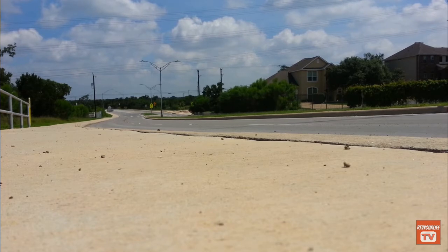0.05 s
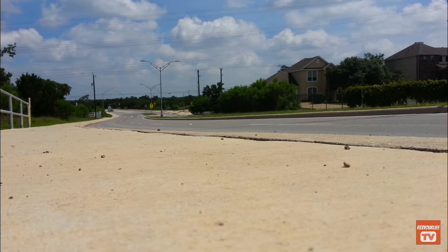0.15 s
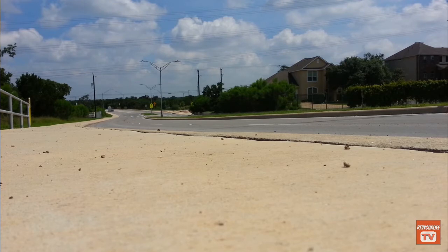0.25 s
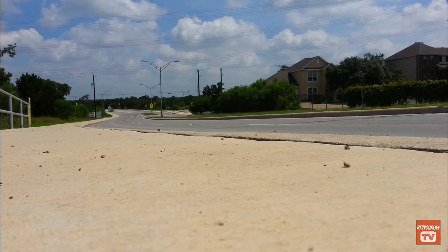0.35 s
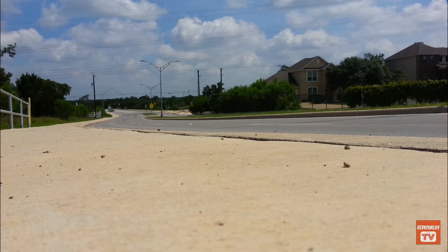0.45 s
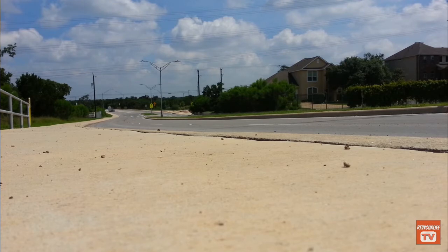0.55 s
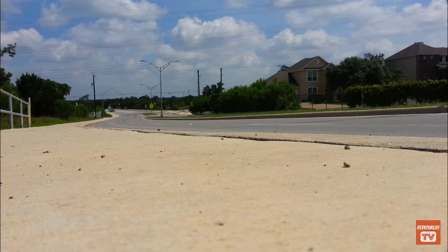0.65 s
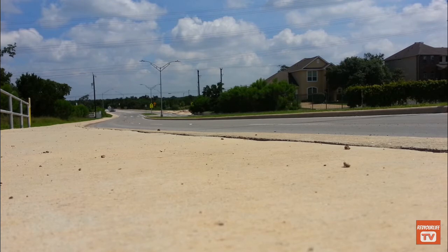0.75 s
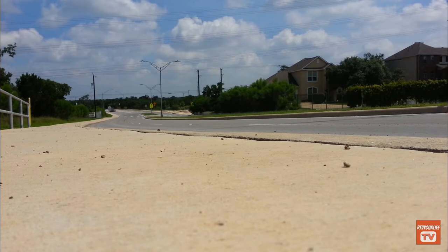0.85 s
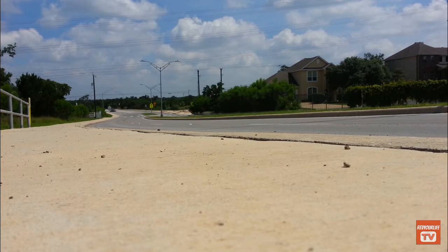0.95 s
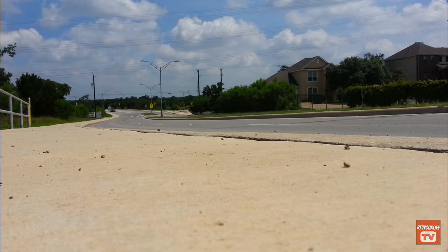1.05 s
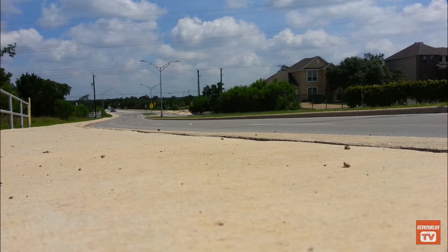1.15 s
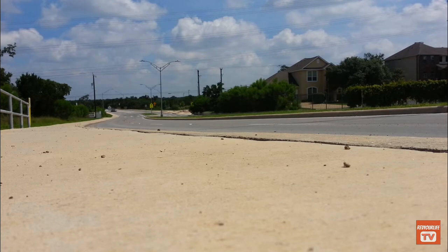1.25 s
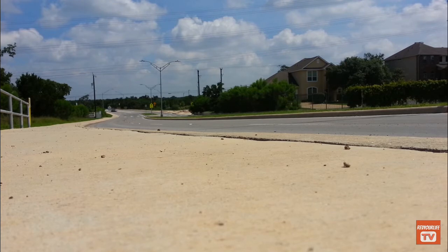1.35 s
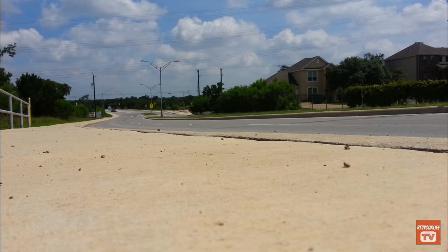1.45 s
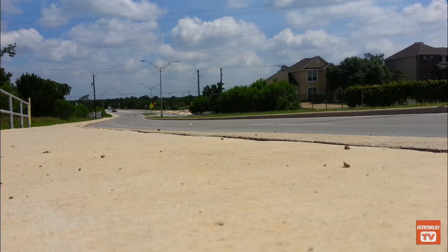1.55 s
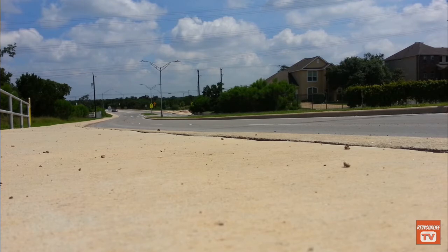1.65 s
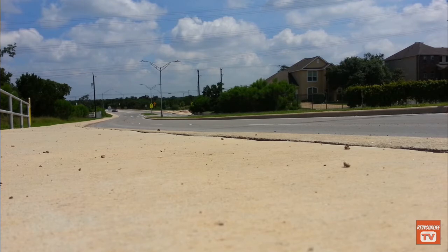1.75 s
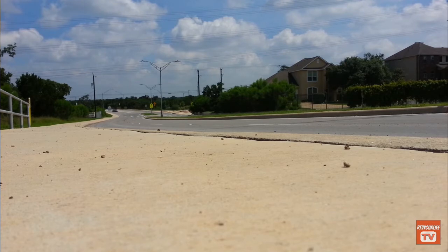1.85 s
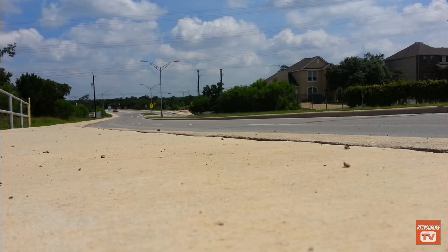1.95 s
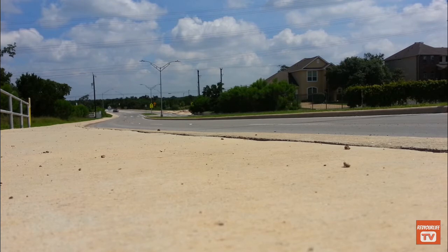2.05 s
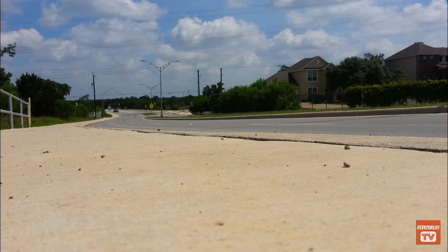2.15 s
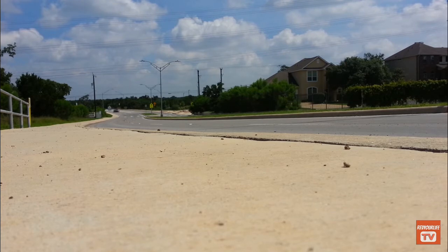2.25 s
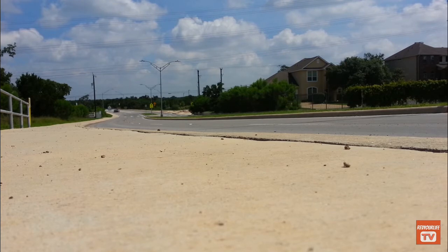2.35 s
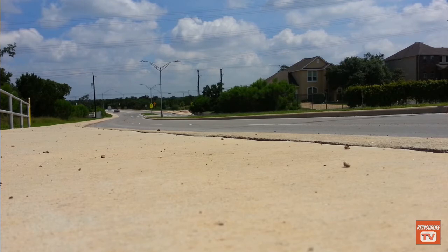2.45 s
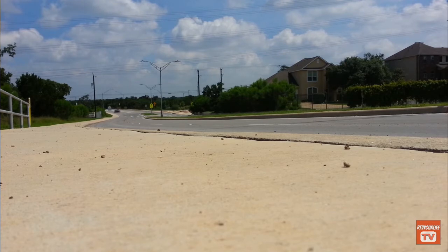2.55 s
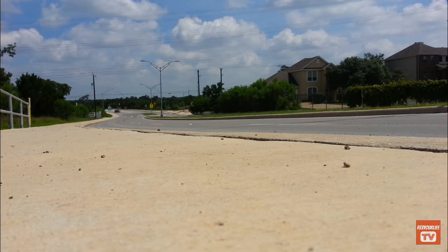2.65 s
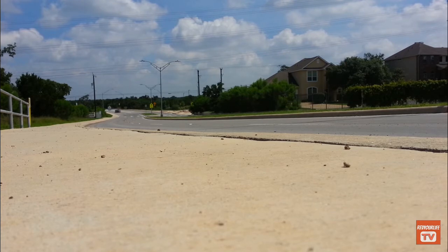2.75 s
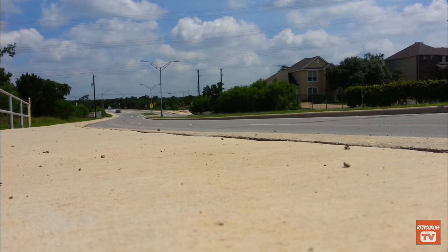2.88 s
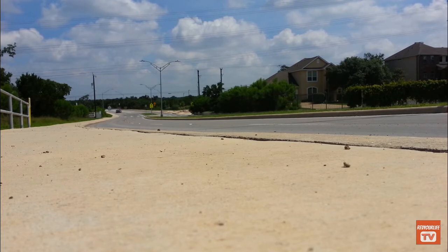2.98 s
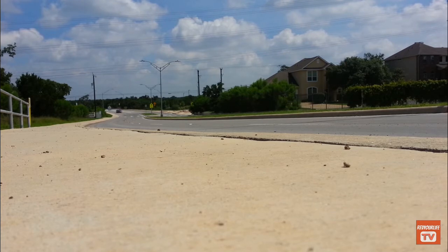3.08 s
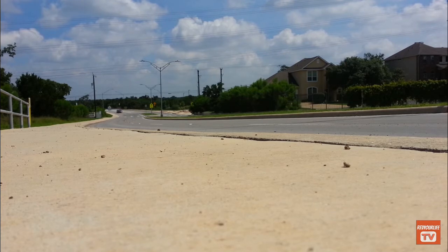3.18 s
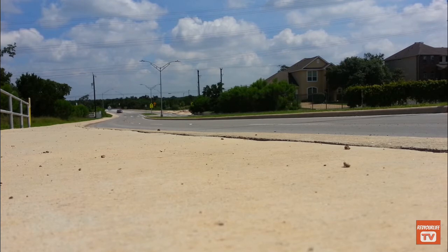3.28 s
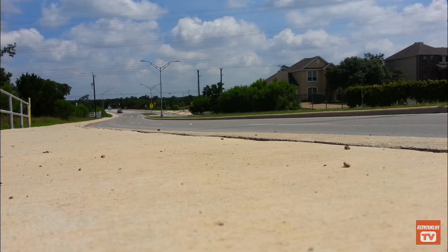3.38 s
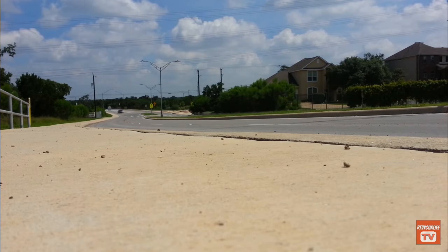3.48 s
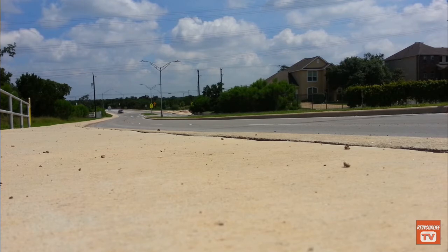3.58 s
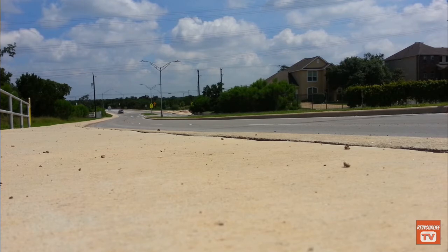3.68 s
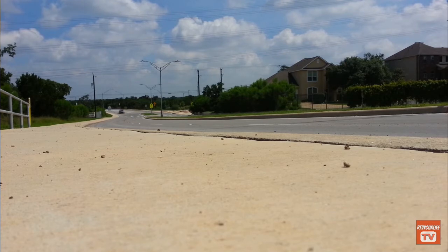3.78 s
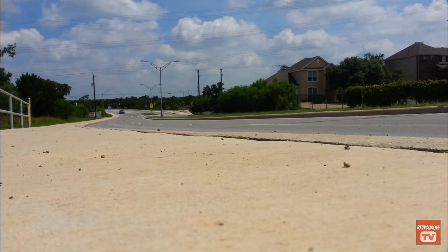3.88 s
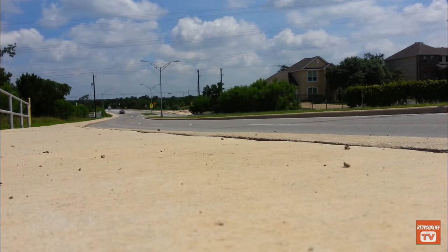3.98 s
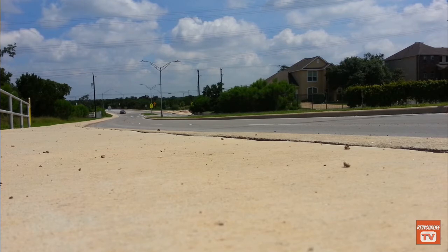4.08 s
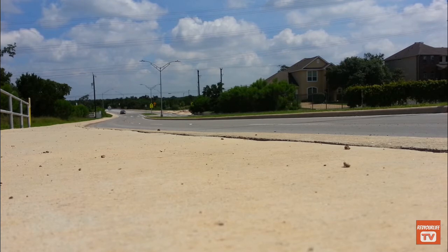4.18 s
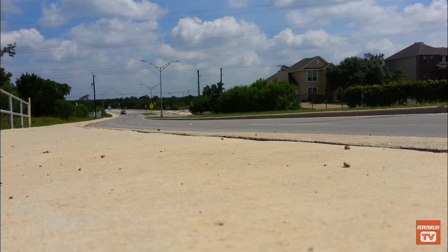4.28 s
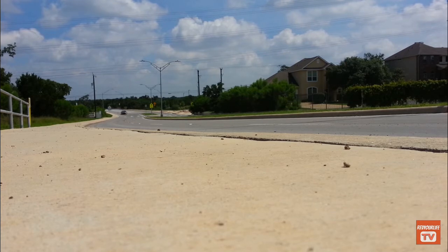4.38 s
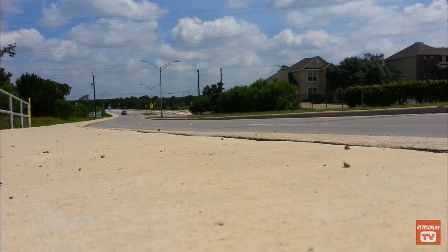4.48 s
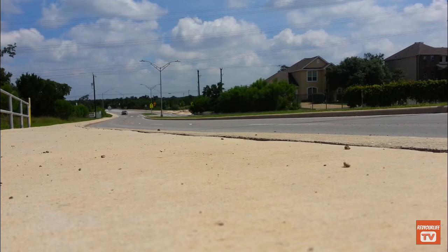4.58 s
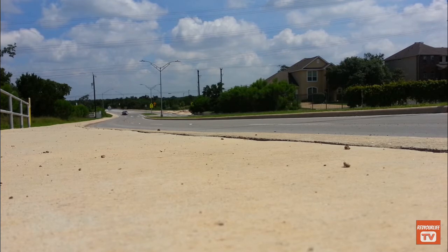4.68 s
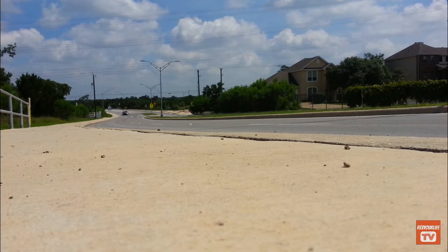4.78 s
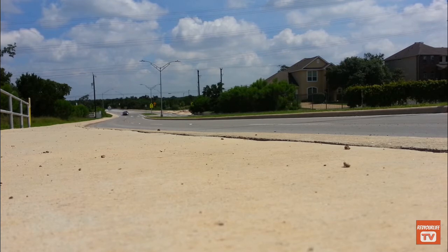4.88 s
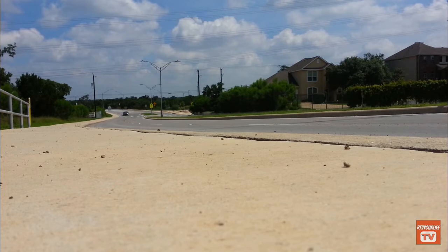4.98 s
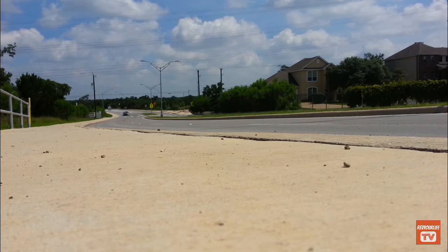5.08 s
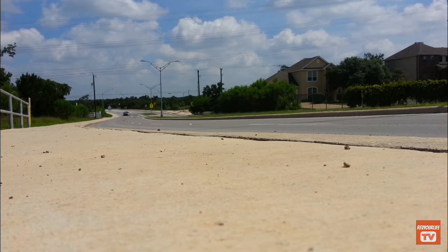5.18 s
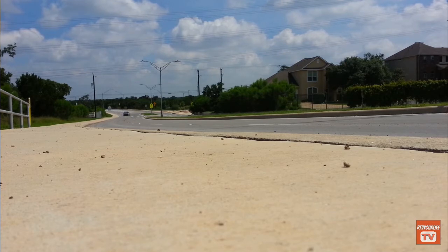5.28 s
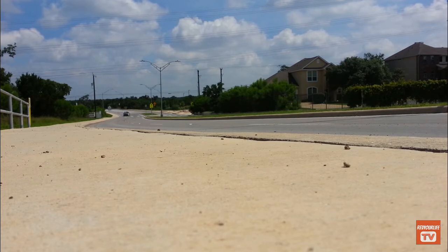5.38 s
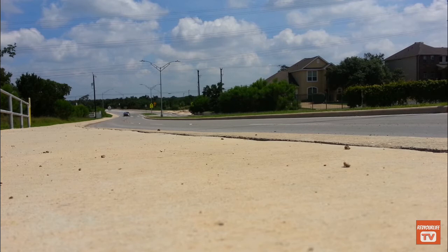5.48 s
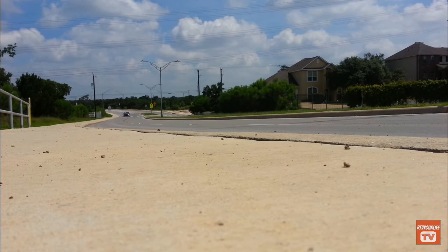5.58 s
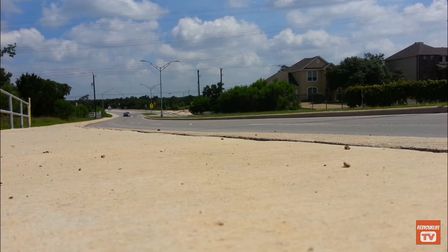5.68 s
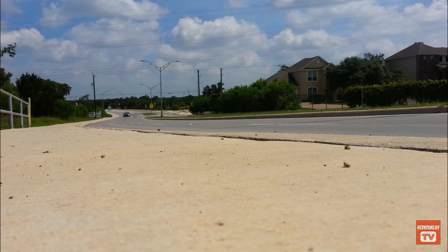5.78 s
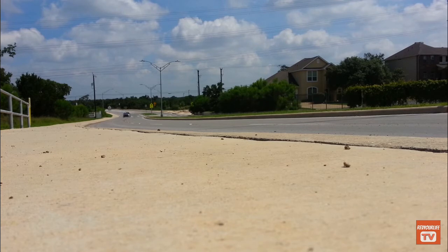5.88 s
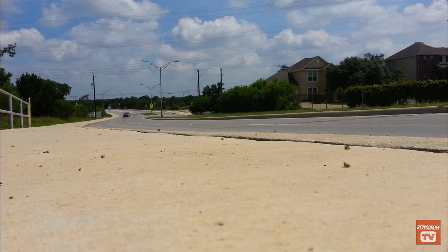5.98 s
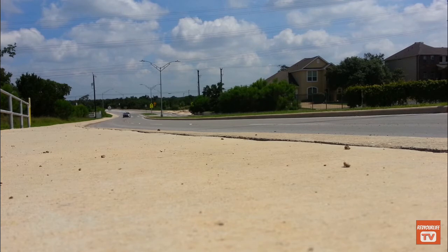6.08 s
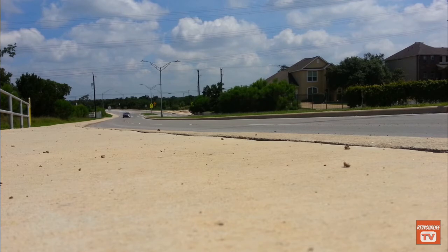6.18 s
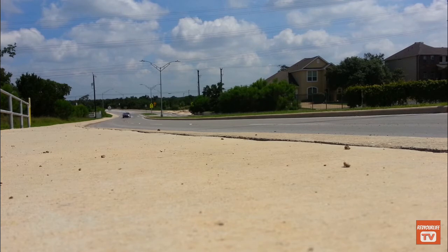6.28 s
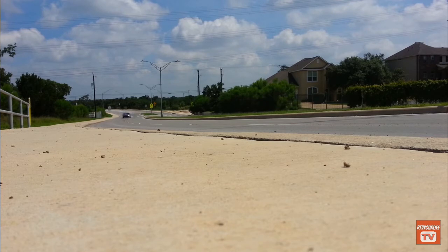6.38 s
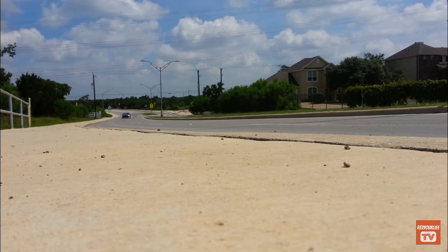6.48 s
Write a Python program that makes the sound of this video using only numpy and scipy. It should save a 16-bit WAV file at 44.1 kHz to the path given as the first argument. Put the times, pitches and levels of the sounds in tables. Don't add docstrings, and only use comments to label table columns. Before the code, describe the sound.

A small single microphone near the ground hears a fading cicada, chirping birds with thin wavering whistles, and distant traffic murmur. After about two and a half seconds a far engine pulls away, rises steadily to high revs, shifts with a raspy chirping release of turbo air, then accelerates again towards the listener. House fronts return late echoes. Small handling ticks occur, one loud near the end; the sound stops while the car is still approaching.

```python
import sys
import numpy as np
from scipy import signal
from scipy.fft import rfft, irfft
from scipy.io import wavfile
from scipy.ndimage import uniform_filter1d

SR = 44100
rng = np.random.default_rng(int(sys.argv[2]) if len(sys.argv) > 2 else 0)


def dump(signal):
    limited = np.clip(np.atleast_2d(signal).T, -1, 1)
    pcm = np.round(limited * 32767).astype(np.int16)
    wavfile.write(sys.argv[1], SR, pcm)


def boost_factor(decibels):
    exponent = np.asarray(decibels, float) / 20
    return 10 ** exponent


N = 288414
T = np.arange(N) / SR

# time in seconds, firing rate in Hz, load in dB, # exhaust note over the load in
# dB, treble let through by the hedges in dB (negative is duller).
DRIVE = [(2.55, 84.33, -55, -8.5, -23), (2.8, 118.3, -50, 2, -21), (3.0, 143.8, -46.5, 0, -15),
         (3.15, 156.7, -43.5, 4, -9), (3.31, 168.7, -43.5, -8, -16), (3.43, 179.5, -43, 1.5, -2.5),
         (3.75, 201.6, -41.5, -0.5, 0.5), (4.02, 234.9, -39.5, -0.5, -2), (4.3, 283.7, -33.5, -5.5, 0),
         (4.56, 332.8, -33, 1, 5.5), (4.71, 330.7, -31.5, -3, 2.5), (4.92, 225.4, -33, -1, 2),
         (5.05, 229.5, -31.5, 2.5, -3.5), (5.4, 261.2, -34, -0.5, 0), (5.95, 308, -31, 0.5, -1),
         (6.1, 314, -30.5, 2.5, -0.5), (6.3, 332, -27, -7, 1), (6.54, 347, -25, -1, -3.5)]
# pitch in Hz, width in Hz, strength in dB.
EXHAUST_PIPE = [(357, 122, 4), (591, 112, 2), (836, 95, 0.5), (1198, 140, -10)]


def level(x, db):
    return x * boost_factor(db) / np.sqrt(np.mean(x ** 2))


def read(table):
    s, *columns = np.transpose(table)
    fade_s = .1
    inside = np.clip(np.minimum(T - s[0] + fade_s, s[-1] + fade_s - T) / fade_s, 0, 1)
    return [np.interp(T, s, c) for c in columns] + [inside]


def colour(x, points):
    hz, db = np.transpose(points)
    f = np.arange(N // 2 + 1) * SR / N + 1
    return irfft(rfft(x) * boost_factor(np.interp(np.log(f), np.log(hz), db)), N)


def cut(x, hz, kind="band", order=4):
    return signal.sosfilt(signal.butter(order, hz, kind, fs=SR, output="sos"), x)


def resonate(x, modes):
    out = 0
    for k, (hz, width, db) in enumerate(modes):
        b, a = signal.iirpeak(hz, hz / width, SR)
        out = out + (-1) ** k * boost_factor(db) * signal.lfilter(b, a, x)
    return out


def noise():
    return rng.standard_normal(N)


def walk(rate):
    k = int(SR / rate)
    steps = np.repeat(rng.standard_normal(N // k + 1), k)
    return 1.3 * uniform_filter1d(uniform_filter1d(steps, k), k)[:N]


def pulses(cycles, sizes):
    whole = np.arange(np.ceil(cycles[0]), np.floor(cycles[-1]))
    at = np.interp(whole, cycles, np.arange(N)).clip(0, N - 2)
    out, i = np.zeros(N), at.astype(int)
    size = boost_factor(sizes[:len(at)])
    np.add.at(out, i, size * (1 - at + i))
    np.add.at(out, i + 1, size * (at - i))
    return out


def chirps(table, bend, flutter_db, rough=0.):
    out, flutter = np.zeros(N), boost_factor(flutter_db * walk(120))
    for s, length, hz0, hz1, db in table:
        u = np.arange(int(length * SR)) / (length * SR)
        hz = hz1 + (hz0 - hz1) * (1 - u) ** bend
        swell = np.sin(np.pi * u ** 0.68) ** 1.12
        i = int(s * SR)
        out[i:i + len(u)] += boost_factor(db) * swell * np.sin(2 * np.pi * np.cumsum(hz) / SR)
    return out * flutter * (1 + rough * walk(500))


def delayed(x, s):
    return np.interp(T - s, T, x, left=0)


def tail(x, t60_s, gap_s, wet_db):
    t = np.arange(SR) / SR
    decay = np.exp(-np.log(1000) * t / t60_s)
    scatter = rng.standard_normal(SR) * decay * np.clip(t / gap_s, 0, 1) ** 2
    scatter = scatter / np.sqrt(np.sum(scatter ** 2))
    return x + boost_factor(wet_db) * signal.fftconvolve(x, scatter)[:N]


def favoured(hz):
    # pitch in Hz, width in Hz, gain in dB.
    peaks = [(133, 15, -8), (204.7, 37, -3), (263.1, 26, 5), (308, 27.6, 5.5), (362.6, 33, 13),
             (398, 34, -4.5), (544, 126, -1.5), (605.3, 32, 1.5), (668.8, 34, 3), (835, 51, -0.5),
             (1000, 240, -12)]
    power = 0
    for centre_hz, width, db in peaks:
        power = power + boost_factor(2 * db) / (1 + (2 * (hz - centre_hz) / width) ** 2) ** 2
    return np.sqrt(power)


def engine():
    orders = [1, 2, 3, 2.5, 11 / 6, 7 / 6]
    order_db = [-0.1, -2, -7.5, -6, -6, -21.5]
    growth = [.01, -.1, -.2, 1.8, .1, .1]
    # sixths of the firing rate, strength in dB.
    sixth_orders = [(5, 9.5), (7, 3.5), (9, -12.5), (10, -7.5), (11, -2), (13, 0.5), (14, 7), (16, -4.5),
                    (17, 6.5)]
    # delay in seconds, level in dB.
    far_walls = [
        (.05, -17.5),
        (.38, -15.5),
    ]
    # time in seconds, level of its echo in dB.
    house_front = [
        (2.5, -26),
        (3.3, -26),
        (3.8, -13),
        (4.3, -6),
        (4.7, -3),
        (4.9, 0),
        (5.05, -1),
        (5.3, -11),
        (6.54, -15),
    ]
    hz, load_db, note_db, _, on = read(DRIVE)
    hz = uniform_filter1d(hz, size=int(.07 * SR))
    cycles = np.cumsum(hz * (1 + .003 * walk(30))) / SR
    clean = 0
    for k, db, grow in zip(orders, order_db, growth):
        air = 1 + (.02 + .09 * k) * (walk(22) + 1j * walk(22))
        tone = np.sqrt(2) * np.imag(air * np.exp(2j * np.pi * k * cycles))
        clean = clean + boost_factor(load_db + note_db + db + grow * (load_db + 30)) * favoured(k * hz) * tone
    sixths = 0
    for k, db in sixth_orders:
        sixths = sixths + boost_factor(db + 3.3 * walk(7)) * np.sin(2 * np.pi * (k * cycles / 6 + rng.random()))
    strength = np.repeat(rng.standard_normal(N // 32 + 1), 32)[:N]
    scatter = resonate(pulses(cycles, np.zeros(3000)) * strength, EXHAUST_PIPE)
    uneven = cut(level(sixths, -14.5) + level(scatter, -8.5), [240, 1600])
    direct = on * (clean + boost_factor(load_db) * uneven)
    heard = direct + boost_factor(read(house_front)[0]) * delayed(direct, .12)
    for s, db in far_walls:
        heard = heard + boost_factor(db) * delayed(direct, s)
    return tail(heard, t60_s=1.5, gap_s=0.081, wet_db=-16), cycles


def roar(cycles):
    # pitch in Hz, level in dB per Hz.
    rasp_colour = [(590, 0), (1000, 2.5), (1090, -1.5), (1220, -3), (2370, -7.5), (3070, -23.5),
                   (4500, -24), (5850, -45.5), (9900, -120)]
    # pitch in Hz, level in dB per Hz.
    hiss_colour = [(1760, -10), (3000, -9), (3950, -7), (4220, -14), (5200, -13.5), (6720, -6.5),
                   (7520, -9.5), (8410, -30), (8800, -38.5), (11400, -61.5), (19400, -120)]
    _, roar_db, _, cover_db, on = read(DRIVE)
    rasp_db = roar_db - 5.5 + cover_db
    hiss_db = roar_db - 18.5 + 0.65 * cover_db
    puff = 1 + .5 * np.cos(2 * np.pi * cycles)
    low = resonate(resonate(noise(), [(670, 2700, 0)]), EXHAUST_PIPE[1:])
    rasp = colour(puff * noise(), [(500, -48)] + rasp_colour)
    hiss = colour(puff * noise(), hiss_colour)
    shimmer = 1.1 * walk(16)
    gas = boost_factor(roar_db - 3.0 + .4 * shimmer + 0.44 * walk(14)) * level(low, 0)
    gas = gas + boost_factor(rasp_db + shimmer) * level(rasp, 0)
    gas = gas + boost_factor(hiss_db + shimmer) * level(hiss, 0)
    return on * gas


def blow_off():
    # start in seconds, length in seconds, start pitch in Hz, end pitch in Hz, level in dB.
    squawks = [
        (4.79, .025, 1803, 1760, -35),
        (4.836, 0.044, 2020, 2070, -30.5),
        (4.885, 0.047, 2065, 2100, -26),
        (4.875, .04, 3700, 3830, -46),
        (4.89, .025, 4110, 4170, -46.5),
        (4.955, 0.072, 2080, 2060, -38.5),
        (4.97, 0.066, 3760, 3630, -50.5),
        (5.015, 0.017, 2040, 2080, -46),
        (5.09, 0.059, 2130, 2084, -43),
        (5.2, 0.11, 1974, 1830, -46),
    ]
    squawk = chirps(squawks, bend=1.5, flutter_db=2, rough=.75)
    throat = [(1770, 390, 0)]
    air = level(resonate(resonate(noise(), throat), throat), -44)
    vent = np.exp(-((T - 4.88) / 0.18) ** 2) * air
    return tail(squawk + vent, t60_s=0.94, gap_s=0.013, wet_db=-10.5)


def idle():
    # time in seconds, spacing of the tones in Hz, level in dB.
    ticking_over = [
        (0, 63.6, -98.5),
        (.6, 65.96, -75.5),
        (1.5, 64.96, -73.5),
        (1.8, 67.3, -71),
        (2.1, 71.15, -69),
        (2.35, 74.5, -68.5),
        (2.5, 71.5, -71.5),
        (2.65, 69.9, -61),
        (2.75, 69.6, -79),
    ]
    hz, idle_db, on = read(ticking_over)
    cycles = np.cumsum(hz * (1 + .012 * walk(9))) / SR
    body = [(466, 220, 0)]
    rumble_db = np.interp(T, [1.8, 2.4], [-75, -60])
    out = boost_factor(rumble_db) * level(resonate(resonate(noise(), body), body), 0)
    for k, db in [(3, 6), (6, 0), (7, 4), (4, 5.8), (5, 0), (8, 4.0)]:
        tone = np.sqrt(2) * np.sin(2 * np.pi * k * cycles)
        out = out + boost_factor(idle_db + db + 3.2 * walk(13)) * favoured(k * hz) * tone
    return on * out


def bird():
    whistle_hz = [2530, 3960]
    # start in seconds, length in seconds, level in dB.
    whistles = [
        [(.57, 0.19, -63.5), (.97, 0.13, -60.5), (1.12, 0.095, -54), (1.45, .11, -61), (1.56, 0.12, -59.5),
         (1.89, 0.074, -61.5), (2.02, 0.12, -56.5), (2.18, 0.11, -78), (2.42, 0.21, -59), (2.69, 0.059, -72),
         (2.79, 0.082, -63)],
        [(.7, .08, -62), (1.14, 0.098, -58), (1.3, 0.063, -62), (1.62, 0.12, -67.5), (1.76, 0.069, -61),
         (2.1, .23, -71)],
    ]
    # delay in seconds, length in seconds, start pitch in Hz, end pitch in Hz.
    parts = [
        (0, .058, 3800, 2790),
        (.085, 0.0474, 3045, 2404),
        (0.269, 0.034, 3790, 3525),
    ]
    # start in seconds, then levels of sweep, hook and chip in dB.
    phrases = [
        (.418, -48, -59, -38),
        (.877, -45, -61, -39),
        (1.335, -46, -54, -42.5),
        (1.804, -46.5, -56, -45),
        (2.281, -48.5, -50, -79),
    ]
    # start in seconds, length in seconds,
    # start pitch in Hz, end pitch in Hz, level in dB.
    second_bird = [(0.823, 0.036, 5900, 6200, -48), (1.19, .025, 3420, 3020, -49),
                   (1.255, 0.1, 5440, 5620, -61), (1.3, 0.087, 5760, 6050, -58),
                   (1.72, 0.033, 5500, 5750, -60), (1.74, 0.03, 5740, 6050, -54.5),
                   (1.747, 0.029, 3630, 3530, -55), (2.041, .11, 5000, 4860, -54),
                   (2.19, 0.067, 5400, 5750, -61), (2.215, 0.085, 5800, 6330, -58),
                   (2.262, 0.098, 6340, 5730, -58), (2.26, 0.083, 5700, 5340, -59)]
    # start in seconds, length in seconds, start and end pitch in Hz, level in dB.
    hoarse = [
        (1.142, .032, 3940, 3560, -47),
        (1.17, 0.032, 3800, 3840, -49),
    ]
    held = 0
    for hz, rows in zip(whistle_hz, whistles):
        breath = 0
        for s, length, db in rows:
            breath = breath + boost_factor(db) * np.clip(np.minimum(T - s, s + length - T) / .03, 0, 1)
        fade = 1 + .3 * (walk(45) + 1j * walk(45))
        held = held + boost_factor(6.0) * breath * np.imag(fade * np.exp(2j * np.pi * hz * T))
    glides = []
    for s, *dbs in phrases:
        for (late, length, hz0, hz1), db in zip(parts, dbs):
            glides.append((s + late, length, hz0, hz1, db))
    calls = chirps(glides, bend=3.6, flutter_db=2.5, rough=.3)
    calls = calls + chirps(second_bird, bend=1.3, flutter_db=3.5, rough=.6)
    calls = calls + chirps(hoarse, bend=2, flutter_db=4, rough=.9)
    return tail(held, t60_s=.35, gap_s=.02, wet_db=-14) + tail(calls, t60_s=.3, gap_s=.012, wet_db=-13)


def cicada():
    # time in seconds, level in dB.
    song_level = [
        (0, -44.5),
        (.45, -46.5),
        (.6, -49.5),
        (.85, -49),
        (1.05, -63.5),
        (1.17, -59),
        (1.3, -66),
        (1.7, -65.5),
        (2.6, -77),
    ]
    # pitch in Hz, width in Hz, strength in dB.
    tymbal = [(7360, 78, -7), (7150, 43, -11), (6740, 31, 1.5), (6820, 270, -3), (7460, 71, -0.5),
              (4900, 160, -8.5), (5470, 190, -13)]
    db, on = read(song_level)
    clicks = pulses(np.cumsum(221 * (1 + 0.034 * walk(90))) / SR, 1.4 * rng.standard_normal(2000))
    drive = level(tail(clicks, t60_s=.1, gap_s=.002, wet_db=2), 0) + level(noise(), -4)
    air = resonate(noise(), [(7450, 1540, -2.5), (3950, 1170, -3)])
    song = level(resonate(drive, tymbal), 0) + level(air, -4.5)
    throb_db = 2.2 * np.cos(2 * np.pi * np.cumsum(23.5 + 3 * walk(6)) / SR) + 1.3 * walk(8)
    return on * boost_factor(db + 2.5 + throb_db) * cut(song, [2800, 7900], order=6)


def ticks():
    # time in seconds, level in dB, tilt in dB per octave.
    knocks = [
        (1.271, -40, -2),
        (2.37, -43, 3),
        (3.204, -35.5, -5),
        (6.107, -18.5, -5),
    ]
    # pitch in Hz, level in dB.
    housing = [(300, -30), (1000, 1.5), (2200, 2), (4000, -8), (7000, -1), (8600, -21), (12500, -35),
               (16000, -30)]
    # start in seconds, length in seconds, start pitch in Hz, end pitch in Hz, level in dB.
    dull_bumps = [
        (2.275, 0.035, 231, 191, -50),
        (2.372, 0.015, 350, 186, -39.5),
    ]
    out = chirps(dull_bumps, bend=1.0, flutter_db=0)
    f = np.arange(1025) * SR / 2048 + 1
    late_s = .0005 + np.minimum(.0018 * (1800 / f) ** 1.6, .014)
    late = np.exp(-2j * np.pi * np.cumsum(late_s) * SR / 2048)
    body_hz, body_db = np.transpose(housing)
    body = boost_factor(np.interp(np.log(f), np.log(body_hz), body_db))
    size = 1600
    for s, db, tilt_db in knocks:
        click = irfft(late * body * boost_factor(tilt_db * np.log2(1 + f / 1000)), 2048)
        i = int(s * SR)
        out[i:i + size] += boost_factor(db) * click[:size] / np.abs(click).max()
        rattle = np.exp(-np.arange(size) / SR / 0.0078) * cut(rng.standard_normal(size), [300, 2500])
        out[i:i + size] += boost_factor(db - 7) * rattle
    return out


def town():
    # pitch in Hz, level in dB per Hz.
    town_colour = [(15, -43.5), (25, -11.5), (48, -14), (65, -15), (114, -15), (161, -13), (329, 1.5),
                   (400, -6), (795, 0), (1400, -12), (2230, -10.5), (2520, -7.5), (5390, -19),
                   (6890, -11.5), (8800, -32.5), (11400, -64.5), (19400, -120)]
    # time in seconds, swell in dB.
    swell = [
        (0, 0),
        (.7, 2.5),
        (1.3, 1.5),
        (1.7, 0.5),
        (2.4, 1),
        (3.2, 0.5),
        (6.54, 9),
    ]
    # pitch in Hz, level in dB.
    steady_tones = [(120, -71.5), (14200, -100)]
    spectrum = rfft(colour(noise(), town_colour))
    octave = np.log2((np.arange(N // 2 + 1) * SR / N + 1) / 20)
    flicker = 0
    for k in range(11):
        band = irfft(spectrum * np.cos(np.pi / 2 * np.clip(octave - k, -1, 1)) ** 2, N)
        flicker = flicker + boost_factor(.8 * walk(8)) * band
    hum = 0
    for hz, db in steady_tones:
        hum = hum + boost_factor(db + 0.45 * walk(7)) * np.sqrt(2) * np.sin(2 * np.pi * hz * T)
    return boost_factor(read(swell)[0]) * level(flicker, -54) + hum


def scene():
    exhaust, cycles = engine()
    gas = cut(roar(cycles) + blow_off(), [230, 8600])
    exhaust = cut(exhaust, 95, "high")
    return (exhaust + gas + idle() + bird() + cicada() + ticks() + town())[None]


def top_cut(x):
    return signal.sosfilt(signal.butter(12, 15720, fs=SR, output="sos"), x)


def record(dry):
    # pitch in Hz, level in dB per Hz.
    preamp_colour = [(3000, -13.5), (9500, -6.5), (12000, -8), (14200, -9), (16000, -6)]
    dry = cut(dry, 40, "high")
    dry = dry * np.clip((N - 1 - np.arange(N)) / 50, 0, 1)
    hiss = level(colour(noise(), preamp_colour), -76.0)
    return top_cut(dry + hiss)


dry = scene()
out = record(dry)
dump(out)
```